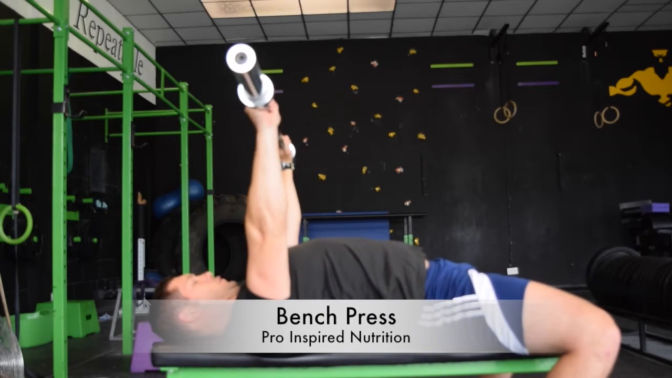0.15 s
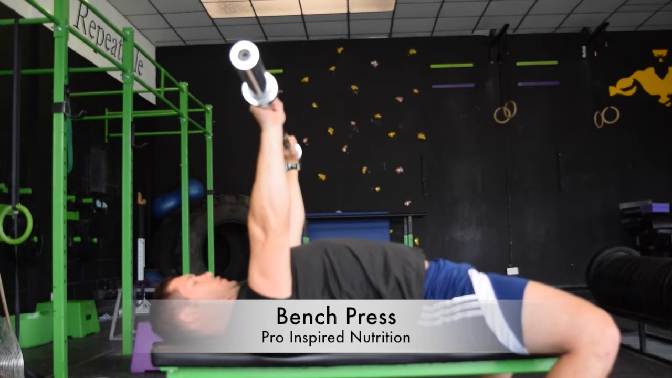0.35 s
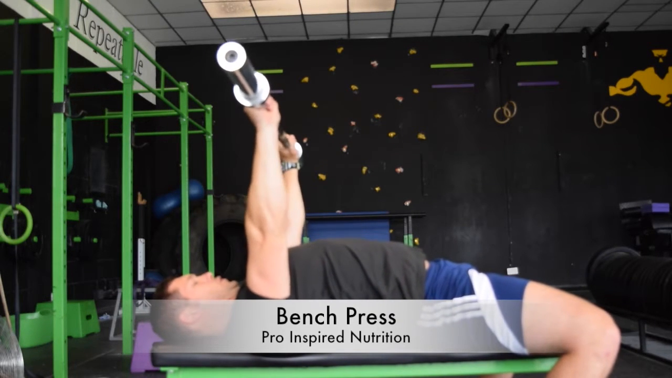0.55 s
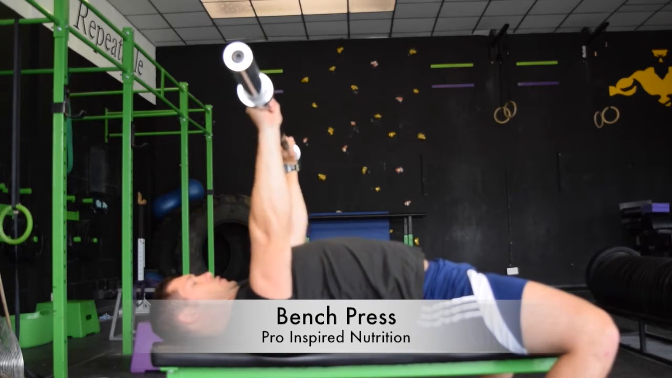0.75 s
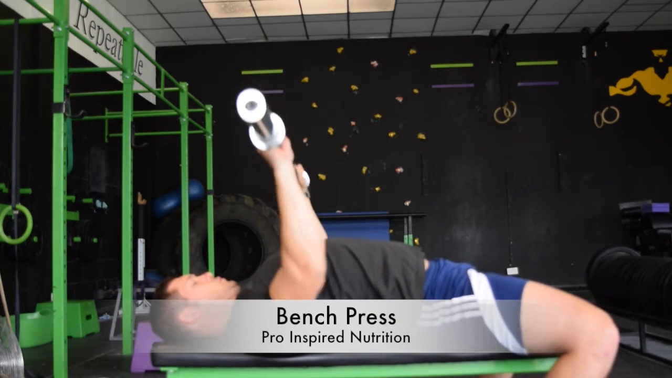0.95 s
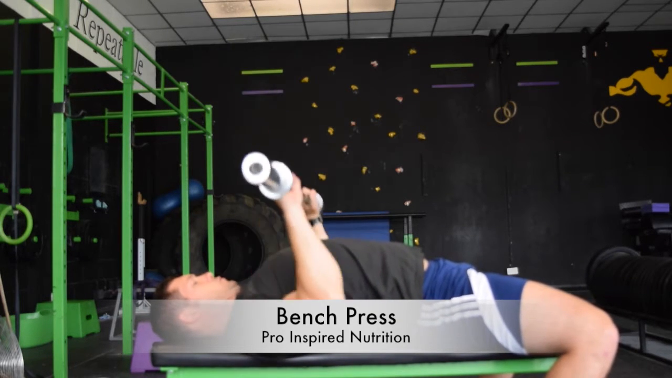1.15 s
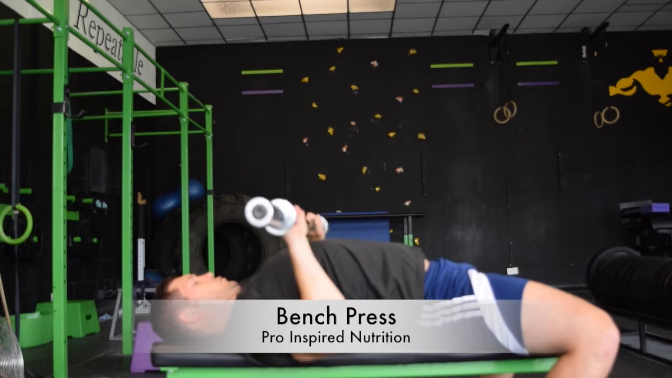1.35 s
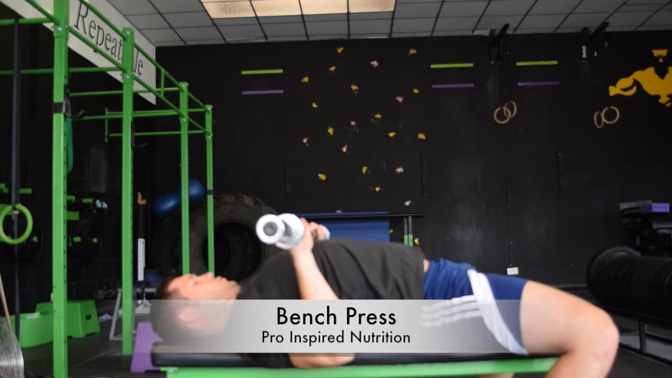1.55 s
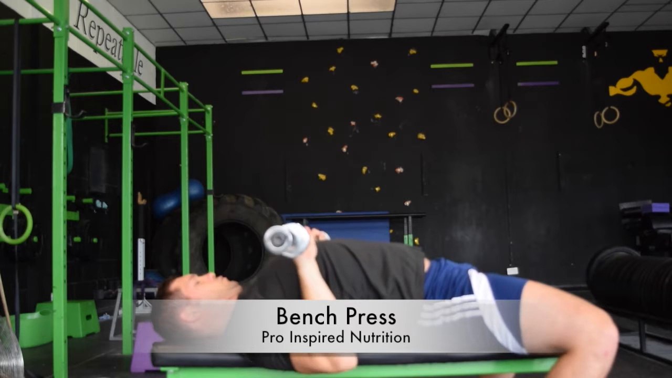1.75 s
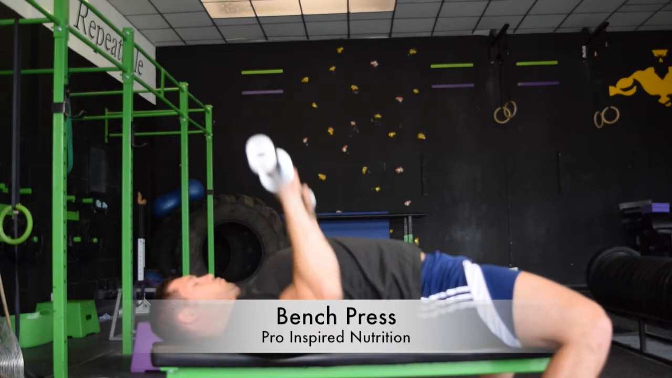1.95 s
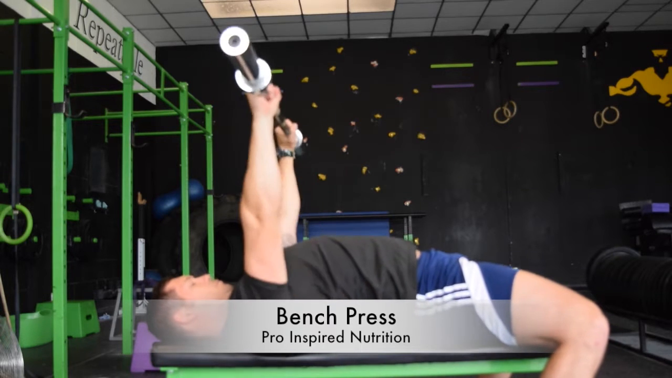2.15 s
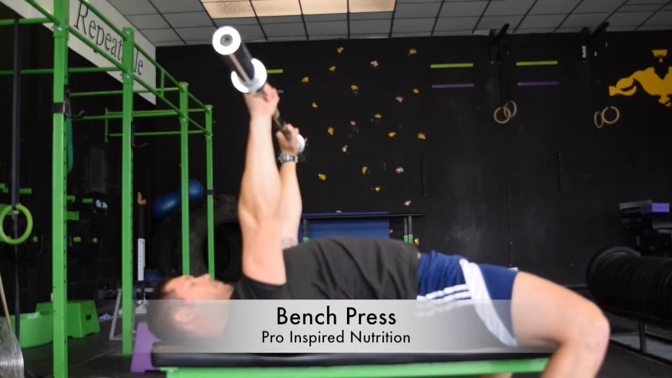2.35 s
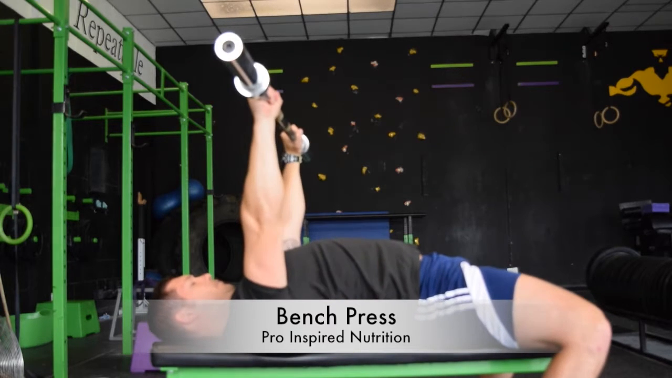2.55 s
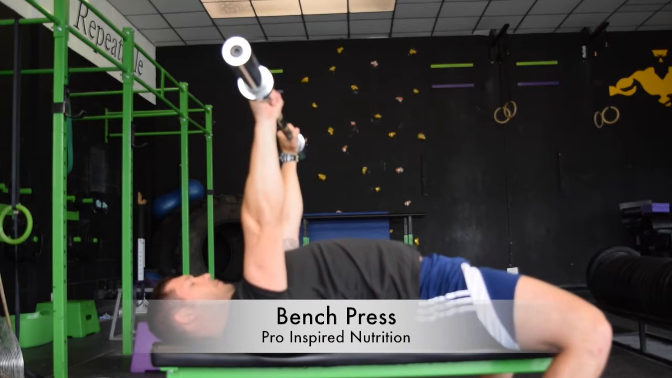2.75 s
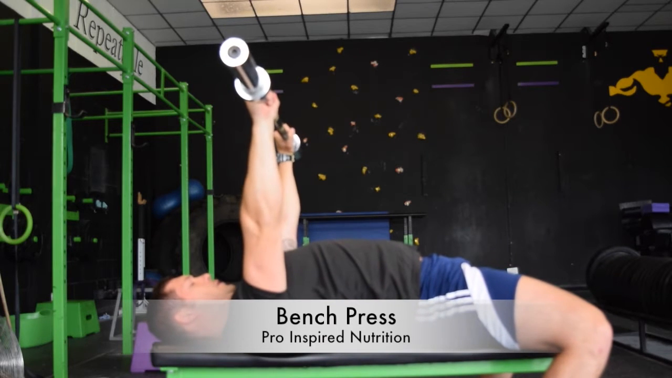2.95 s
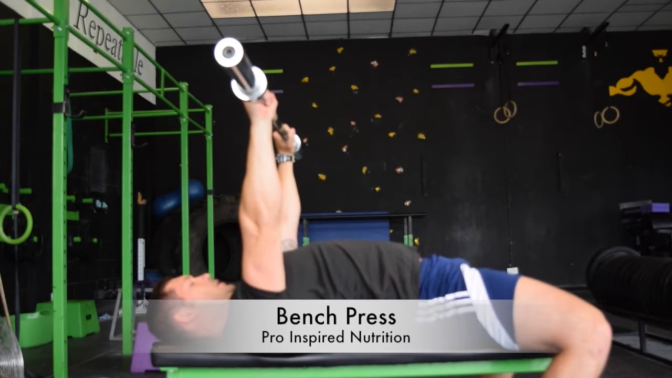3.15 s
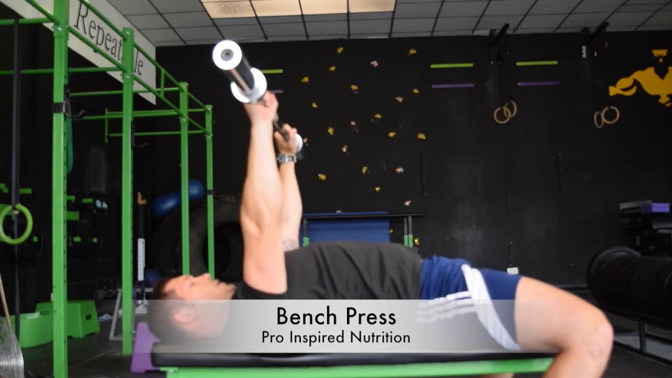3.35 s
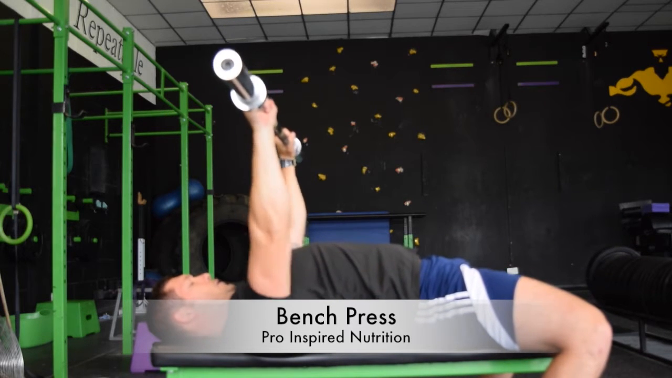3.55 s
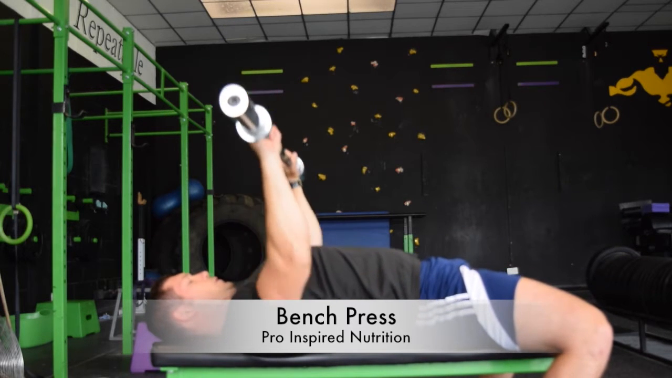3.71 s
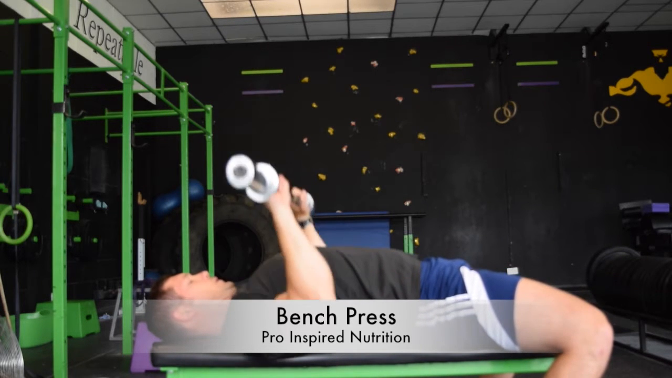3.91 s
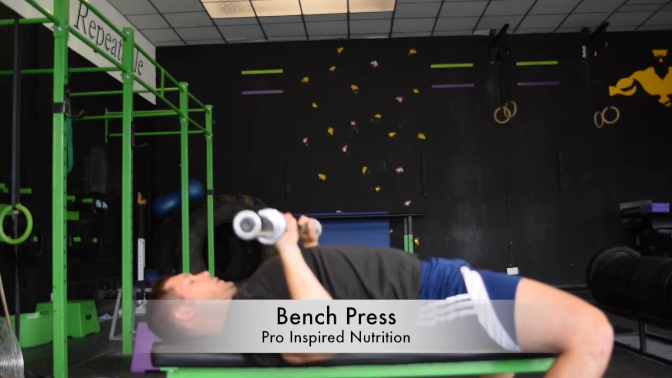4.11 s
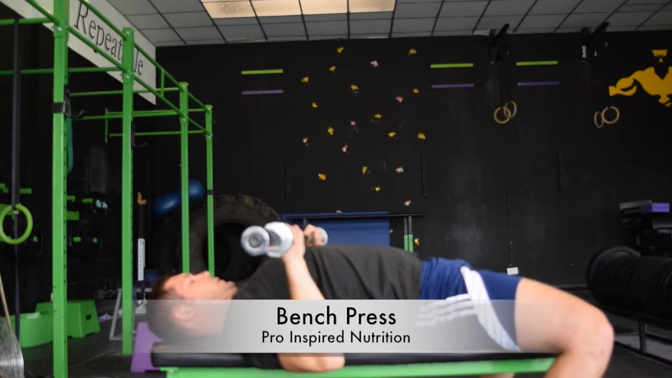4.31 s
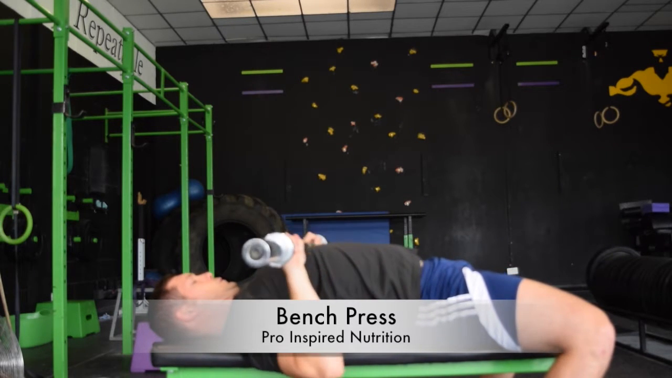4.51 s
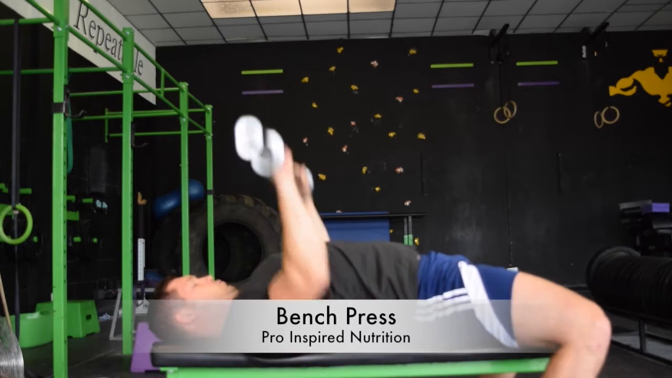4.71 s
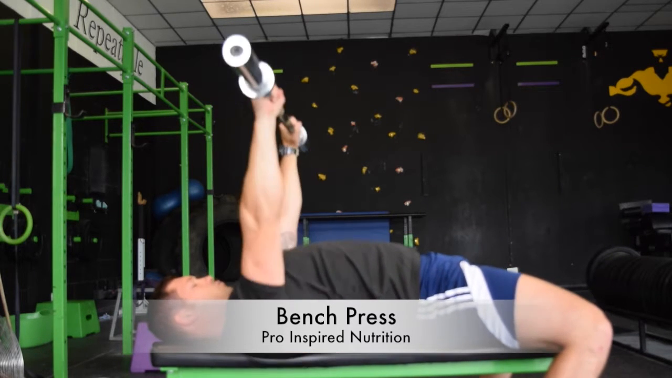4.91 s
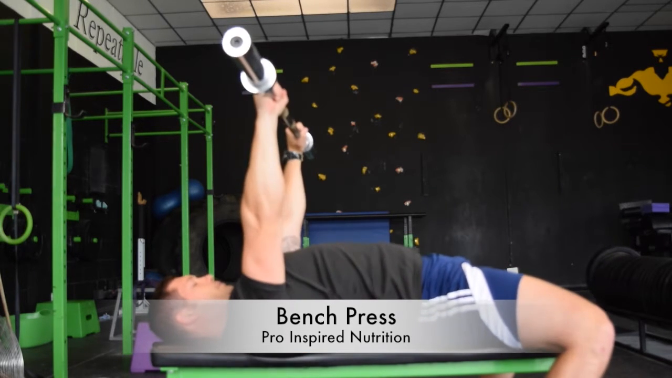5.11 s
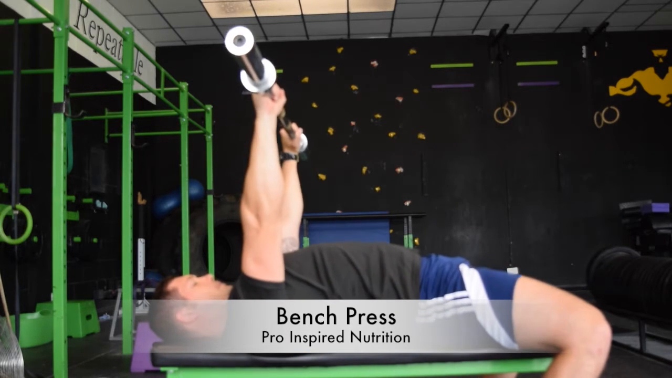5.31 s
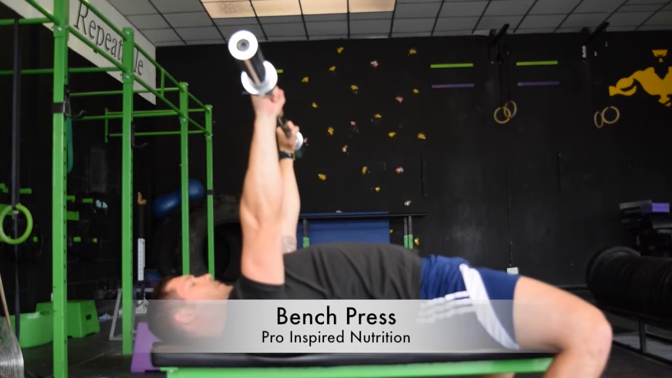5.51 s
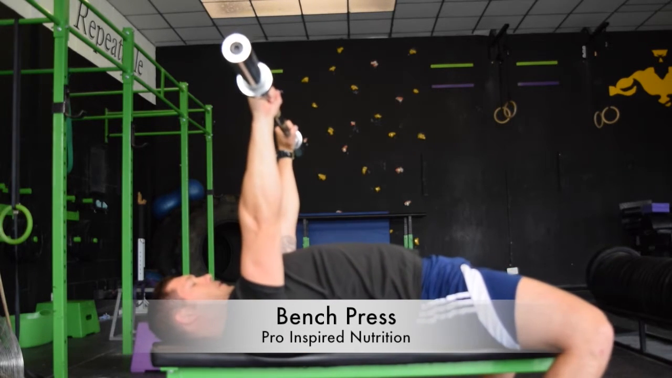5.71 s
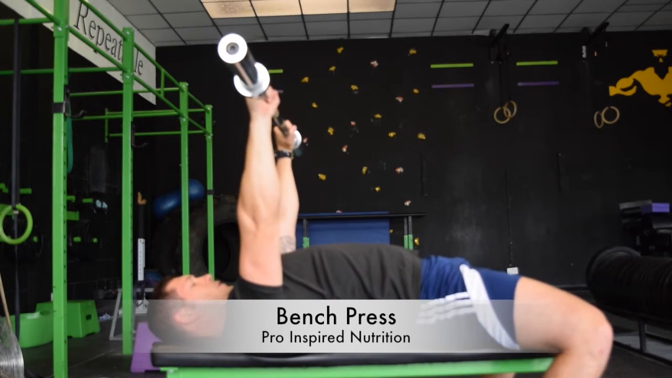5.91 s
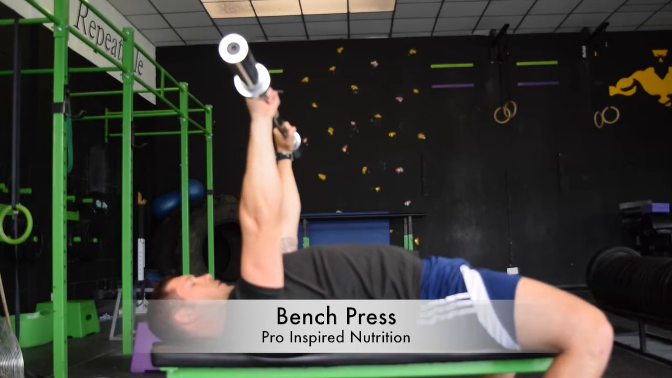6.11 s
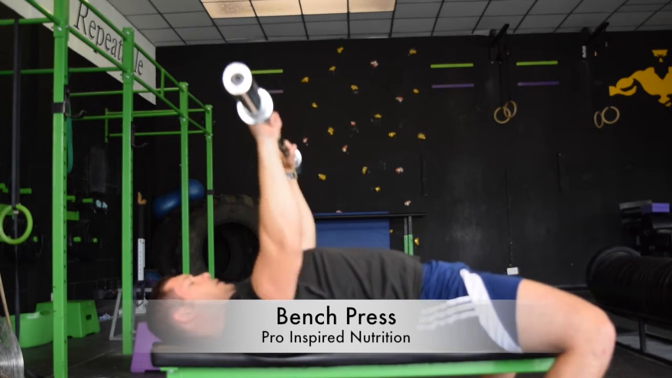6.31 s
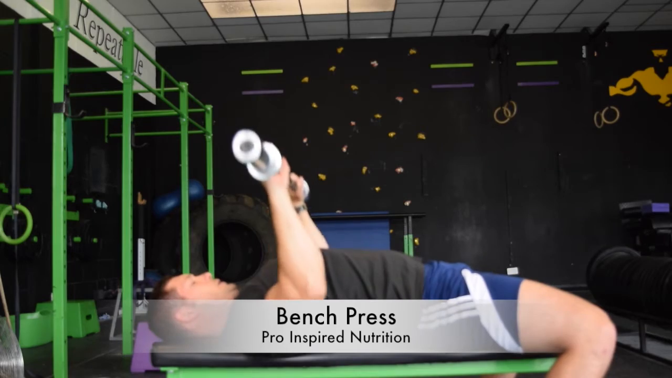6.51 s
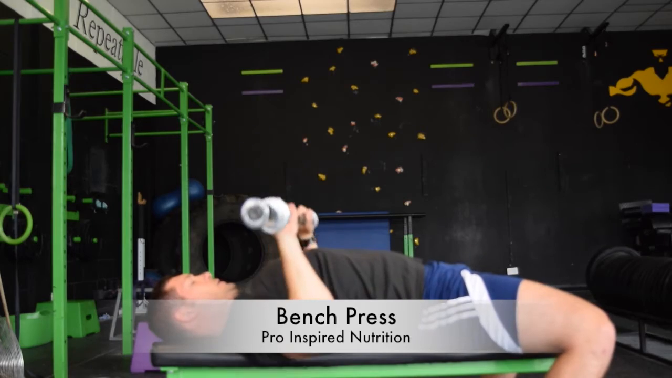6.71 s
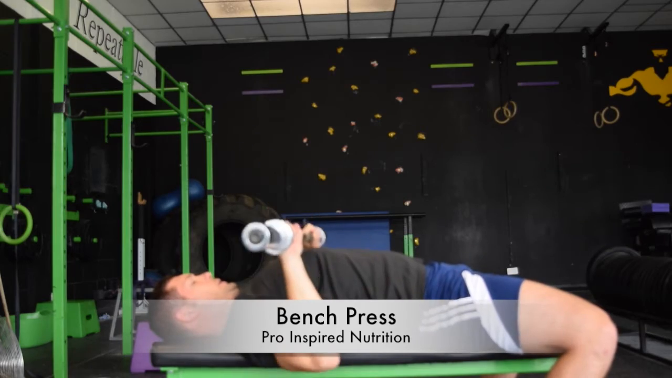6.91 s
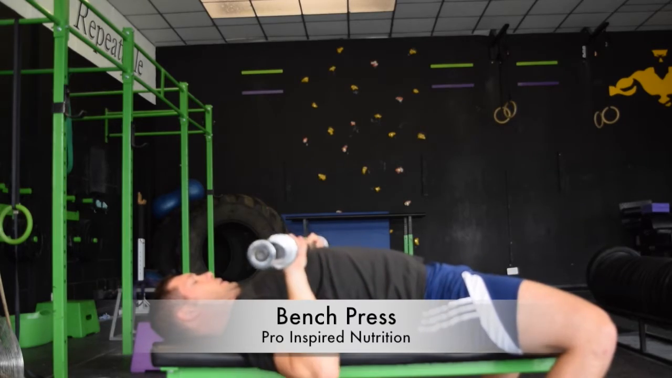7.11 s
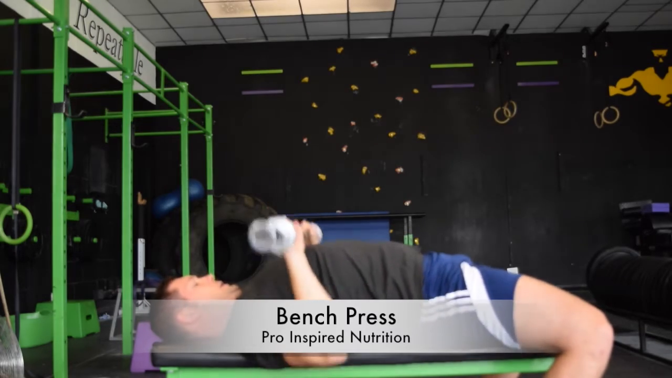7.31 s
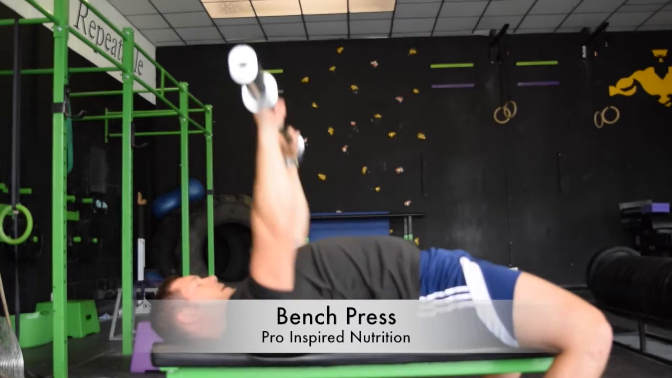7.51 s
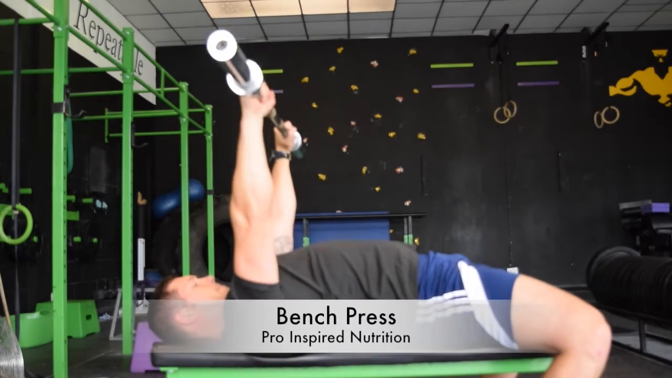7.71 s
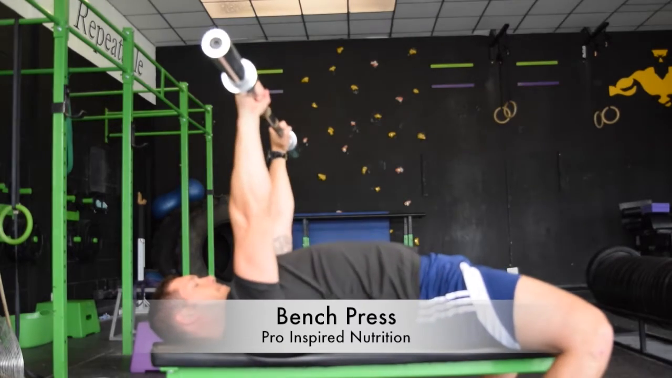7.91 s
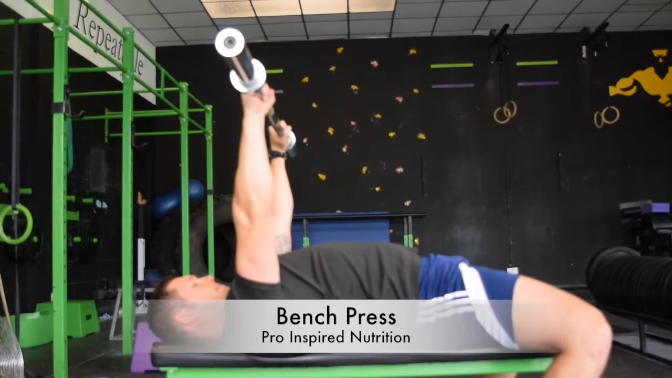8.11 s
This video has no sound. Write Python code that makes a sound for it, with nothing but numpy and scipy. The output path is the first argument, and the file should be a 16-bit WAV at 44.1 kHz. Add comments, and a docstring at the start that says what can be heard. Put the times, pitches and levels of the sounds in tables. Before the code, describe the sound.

Three presses of a steel bar, each with a quick bright rattling clank, in a large bare hall with low hum and an engine drone outside.

```python
"""Barbell presses in a bare gym

A steel barbell is pressed up three times in a large bare gym. Loose sleeves knock against the bar: a short
pulse with crack and rattle, a ring of decaying steel modes, and a filtered click that clanks in the hall.
Behind it are shaped noise for ventilation, traffic and a faint whistle, an engine drone that slows, swells
and fades, and steady mains tones. One microphone hears it all and adds hiss."""
import sys
import numpy as np
from scipy import signal
from scipy.fft import rfft, irfft
from scipy.io import wavfile

SR = 44100
rng = np.random.default_rng(int(sys.argv[2]) if len(sys.argv) > 2 else 0)


def to_wav(s):
    """Save 16-bit WAV."""
    ch = np.atleast_2d(s).T  # columns
    pcm = np.round(np.clip(ch, -1, 1) * 32767)  # PCM
    wavfile.write(sys.argv[1], SR, pcm.astype(np.int16))


N = 364266
TIME = np.arange(N) / SR

# Sleeve knocks. Each row: start in seconds, pulse peak in dB, pulse colour in Hz, then weights in dB relative
# to the pulse for crack, clank, bar ring, low sleeve ring and high sleeve ring, last near sleeve's tilt in dB
# (added to the near sleeve's own modes, taken from the far sleeve's).
KNOCKS = [(0.1772, -51.5, 9000, -10, -14, -28, -29, -29, 0),
          (2.0354, -39.5, 4700, -16, 14.5, -6.5, -22, -23, -2),
          (2.1417, -32, 4360, -22, 9.5, -11, -23, -26, -3), (2.1588, -40, 5500, -12, 16, -22, -16, -17, 8),
          (2.1642, -26, 5510, -4, -17, -16, -12, -12, 6), (2.241, -25, 2400, -27, -11, -5, -28, -30, 0),
          (2.247, -11, 4560, 0.5, 0, -10, -36, -14.5, -8.5),
          (2.2581, -11.5, 3915, -12, -21, -8.5, -33, -15, -3), (2.412, -34, 3950, -20, -7, -1, -30, -30, 0),
          (4.6980, -37, 1600, 2.5, -2, -28, -36, -36, 0), (4.6996, -35, 6370, -3, -9, -30, -43, -36, 0),
          (4.714, -42, 3000, -20, -12, -32, -25, -27, 0), (4.7767, -37.5, 5580, -10, 15, 0, -12, -29, 1),
          (4.790, -29.5, 2420, -20, 1.5, -11, -18, -27, -9),
          (4.838, -30.5, 3620, -12, 6.5, -9, -19, -21, -6),
          (4.8487, -19, 6340, -12, 3, -9, -13.5, -12.5, -2.5),
          (4.9410, -12.5, 4750, 5, 2, -19, -31, -20, 0), (4.9544, -22, 5230, -15, -3, -7, -18, -14, 0),
          (5.1100, -34.5, 5400, -17, -16, -16, -19, -20, 3),
          (7.3180, -49.5, 3400, -1, -5, -6, -23, -16, -2), (7.504, -41, 5000, -16, 10, -20, -26, -28, 0),
          (7.5172, -30, 2500, -22, 3, -13, -12, -19, 0), (7.571, -16, 4860, -26, -16, -26, -35, -37, 0),
          (7.5755, -8.5, 5060, -2.5, -7, -23, -28, -34, 6), (7.587, -36, 10650, -20, -10, -22, -14, -11, 1),
          (7.5963, -22.5, 5520, -20, -8, -2, -18, -7.5, 9),
          (7.6762, -9.5, 5470, -20, -9.5, -21, -42, -12.5, 2),
          (7.6901, -14, 5240, -22, 1, -11, -30, -17, 4)]
# Noise outside and in the ducts. Each row: time in seconds, then ventilation rumble, traffic roar and
# passing tyre hiss, each in dB rms before its slow drift.
BACKGROUND = [(0, -41, -51.5, -56), (1.2, -44, -51, -57.5), (2.2, -45.5, -53, -60), (4, -46.5, -53.5, -64),
              (5.6, -47, -49.5, -64.5), (6.6, -46, -50, -64), (8.26, -46.5, -49.5, -60.5)]


def from_db(db):
    """Turn decibels into an amplitude gain."""
    return 10 ** (np.asarray(db) / 20)


def rms_one(x):
    """Scale a signal to rms 1."""
    return x / np.sqrt(np.mean(x ** 2) + 1e-20)


def in_time(rows):
    """Interpolate each column of a timed table, sample by sample."""
    seconds, *columns = np.transpose(rows)
    return [np.interp(TIME, seconds, column) for column in columns]


def at_hz(points, hz):
    """Read a table of (Hz, value) on a log-frequency axis."""
    table_hz, values = np.array(points).T
    return np.interp(np.log(hz), np.log(table_hz), values)


def drift(rate_hz):
    """Slow random motion of rms 1: white noise through two equal low-pass poles at rate_hz."""
    step = 40   # computed on every 40th sample
    pole = np.exp(-2 * np.pi * rate_hz * step / SR)
    white = rng.standard_normal(N // step + 2002)
    slow = signal.lfilter([1], [1, -2 * pole, pole * pole], white)[2000:]   # skip the filter's start
    return np.interp(np.arange(N) / step, np.arange(len(slow)), rms_one(slow))


def coloured(x, spectrum):
    """Shape a signal by a gain curve of (Hz, dB)."""
    hz = np.maximum(np.arange(len(x) // 2 + 1) * SR / len(x), 1)
    return irfft(rfft(x) * from_db(at_hz(spectrum, hz)), len(x))


def noise(spectrum, level_db):
    """White noise shaped by a spectrum, scaled to rms 1, then given a fixed or moving level."""
    return rms_one(coloured(rng.standard_normal(N), spectrum)) * from_db(level_db)


def ventilation():
    """Low rumble of moving air: shaped noise with a slight slow drift in level."""
    # Each row: frequency in Hz, relative density in dB per Hz.
    rumble = [(15, -40), (25, -38), (43, -6.5), (97, -0.5), (172, -2.5), (204, -4), (305, -12.5),
              (600, -21.5), (780, -28), (1320, -120)]
    return noise(rumble, in_time(BACKGROUND)[0] + 0.21 * drift(1.0))


def traffic():
    """Road noise outside: roar, passing tyre hiss and heavy traffic through the walls, each drifting noise."""
    # Roar, tyre hiss and deep spectra. Each row: frequency in Hz, relative density in dB per Hz.
    roar, tyres, deep = [(250, -4), (550, -3.5), (900, 3), (1300, -0.5), (2000, -13), (3500, -38),
                         (6000, -47), (16000, -81.5)], [(600, -5.5), (1500, 10.5), (3300, 4), (4200, -2.5), (8000, -20),
                                       (16000, -39)], [(25, -54), (50, -3), (85, -5), (125, 6.5), (200, -29),
                                                      (500, -93.5)]
    # Heavy traffic. Each row: time in seconds, level in dB rms before its drift.
    deep_level = [(0, -73), (3.5, -64), (4.8, -50.5), (6.3, -68), (7.05, -47.5), (8.26, -57.5)]
    _, roar_db, tyre_db = in_time(BACKGROUND)
    road = noise(roar, roar_db + 0.7 * drift(6.1))
    road = road + noise(tyres, tyre_db + 0.5 * drift(1.6))
    return road + noise(deep, in_time(deep_level)[0] + 3.5 * drift(3.2))


def whistle(hz, half_width_hz):
    """Faint thin whistle: noise in a narrow band around hz, with a moving level."""
    # Each row: time in seconds, level in dB.
    squeal = [(7.1, -80), (7.38, -71), (7.44, -64), (7.56, -72)]
    edges = [hz - half_width_hz, hz + half_width_hz]
    band = signal.butter(2, edges, "band", fs=SR, output="sos")
    return rms_one(signal.sosfilt(band, rng.standard_normal(N))) * from_db(in_time(squeal)[0])


def engine_drone():
    """Engine outside: one sine that holds its pitch, then slows towards idle, wavering in pitch and level."""
    engine_hz, idle_hz = 71, 57.5
    slows_at_s, slowing_s = 3.2, 0.758   # start and time constant of the slowing
    # Each row: time in seconds, level in dB rms before its drift.
    drone_level = [(0, -41), (1.33, -40.5), (1.6, -60), (2.1, -50), (2.33, -45), (3.1, -50.5), (3.35, -59),
                   (4.47, -49), (5.05, -45.5), (6.4, -81)]
    since_slowing = np.maximum(TIME - slows_at_s, 0)
    hz = idle_hz + (engine_hz - idle_hz) * np.exp(-since_slowing / slowing_s)
    level_db = in_time(drone_level)[0] + 1.04 * drift(5.5)
    phase = 2 * np.pi * np.cumsum(hz + 0.5 * drift(3.9)) / SR
    return np.sqrt(2) * from_db(level_db) * np.sin(phase)


def mains_hum():
    """Mains hum: steady sines from random phases, their levels drifting slightly."""
    # Each row: frequency in Hz, level in dB rms before its drift.
    mains = [(200, -52.5), (300, -61.5)]
    hum = 0
    for hz, db in mains:
        level = np.sqrt(2) * from_db(db + 0.47 * drift(1.15))
        hum = hum + level * np.sin(2 * np.pi * hz * TIME + rng.uniform(0, 2 * np.pi))
    return hum


def background():
    """Sum everything behind the barbell."""
    return ventilation() + traffic() + engine_drone() + mains_hum() + whistle(hz=3400, half_width_hz=110)


def hall(x):
    """Gym echo: dense noise that swells in, is strong at first, then dies band by band; echo energy 1."""
    # Each row: frequency in Hz, time in seconds to fall 60 dB.
    hall_t60 = [(300, 0.53), (790, 0.77), (2090, 1), (5510, 0.74), (14600, 0.2)]
    swell_s, early_db, early_t60_s = 0.007, 8.5, 0.064   # early part: extra gain, multiplying the tail
    t = TIME[:round(1.5 * SR)]
    edges, tail = np.geomspace(200, 18000, 14), 0
    for low, high in zip(edges, edges[1:]):
        band_filter = signal.butter(2, [low, high], "band", fs=SR, output="sos")
        band = signal.sosfilt(band_filter, rng.standard_normal(len(t)))
        tail = tail + band * from_db(-60 * t / at_hz(hall_t60, np.sqrt(low * high)))
    swell = 1 - np.exp(-(t / swell_s) ** 2)
    tail = tail * swell * (1 + from_db(early_db - 60 * t / early_t60_s))
    return signal.fftconvolve(x, tail / np.sqrt(np.sum(tail ** 2)))[:N]


def clicks_at(level_db):
    """One single-sample click for each knock."""
    out = np.zeros(N)
    out[(np.array(KNOCKS)[:, 0] * SR).astype(int)] = from_db(level_db)
    return out


def clank():
    """Broad clank sent to the hall: shaped clicks, with a bright part that grows faster with the blow."""
    # Body and bright part. Each row: frequency in Hz, relative gain in dB.
    body, crash = [(180, -13), (350, -15), (800, -3), (1500, -6.5), (2450, -2), (3100, -9.5), (4500, -18),
                   (7000, -16.5), (10000, -52)], [(2000, -42), (3500, -37), (5300, -11), (7500, -9), (9000, -8),
                                  (11000, -9), (16000, -31)]
    tick_db, clank_db = np.array(KNOCKS)[:, [1, 4]].T
    dull = coloured(clicks_at(tick_db + clank_db + 23.0), body)
    # harder blows are shorter, so brighter
    bright = coloured(clicks_at(1.6 * tick_db + clank_db + 26), crash)
    return dull + bright


def ticks(cycles, rattle_t60, rattle_width):
    """Contact: a few cycles at the knock's colour, a broad crack, then a rattle of micro-bounces as noise."""
    rattle_gain_db, rattle_follows = -4, 0.65   # gain at a -25 dB tick; growth in dB per dB of tick
    crack_t60_s, crack_from_hz, crack_to_hz = 0.0021, 570, 15000
    out, t = np.zeros(N), np.arange(1024) / SR
    grit = rng.standard_normal((len(KNOCKS), 1024))
    crack_filter = signal.butter(1, [crack_from_hz, crack_to_hz], "band", fs=SR)
    for (s, db, hz, crack_db, *_), grains in zip(KNOCKS, grit):
        # pulse: ramps up, then falls 60 dB within the given number of cycles
        pulse = np.sin(2 * np.pi * hz * t) * t * hz * from_db(-60 * t * hz / cycles)
        pulse = pulse / np.abs(pulse).max()

        crack = signal.lfilter(*crack_filter, grains[::-1])
        crack = crack * from_db(crack_db - 60 * t / crack_t60_s)

        edges = [hz / rattle_width, min(hz * rattle_width, 0.45 * SR)]
        rattle = rms_one(signal.lfilter(*signal.butter(2, edges, "band", fs=SR), grains)) / 2
        rattle_db = rattle_gain_db + (rattle_follows - 1) * (db + 25.0)   # relative to the pulse
        rattle = rattle * from_db(rattle_db - 60 * t / rattle_t60)

        i = int(s * SR)
        out[i:i + 1024] += from_db(db) * (pulse + crack + rattle)
    return out


def steel(ring_db, spread_db, favour_db, jolt_db, jolt_t60, wobble_db, wobble_rate,
          bar_wander_rad, sleeve_wander_rad):
    """Knocks excite decaying modes of bar and sleeves, favouring modes near their colour; grip shortens them."""
    # Mode frequencies in Hz. Rows: the bar, the sleeves' low modes, the sleeves' high modes; close pairs beat.
    modes_hz = [
        [1475, 1884, 2347, 2385, 2525, 2826, 3915, 4560, 5227, 5885, 6627, 7381],
        [2449, 2490, 5516, 5575],
        [8610, 9054, 9503, 9525, 9590, 10632, 10681, 12080, 12170, 13065, 13560, 14227, 15360],
    ]
    # Same layout, each mode: relative strength in dB, full time in seconds to fall 60 dB.
    mode_rings = [
        [(-8, 0.15), (-10, 0.41), (-6, 0.6), (-1.5, 1.05), (-6, 0.7), (-10, 0.3), (-17, 0.8), (-12, 0.6),
         (-16, 0.9), (-14, 0.47), (-13, 0.5), (-14, 0.4)],
        [(-8, 0.2), (-7, 0.2), (-2.5, 0.45), (-3, 0.25)],
        [(-12, 0.35), (-1.5, 0.62), (-1.5, 1.0), (-1.5, 0.6), (-8, .4), (-3, 0.45), (-4, 0.55), (-10, 0.22),
         (-9, .4), (-8, 0.1), (-15, 0.25), (-12, 0.24), (-15, 0.12)],
    ]
    # Each row: lift start in seconds, share of the full ring time for the bar, share for the sleeves.
    lift_rows = [(1.8, 0.96, 1), (4.5, 0.55, 0.77), (7.25, 0.57, 0.56)]
    # The two sleeves differ a little: modes in Hz that belong to one sleeve alone.
    near_hz, far_hz = [2490, 5516, 9525, 10632], [2449, 5575, 9054, 9503, 10681]
    hard_db, regrip_db = -17, -16   # a harder knock reseats the sleeves and damps what was ringing
    soft_shortens = 0.1   # dB of ring time lost per dB below a hard knock

    t = TIME[:SR * 3 // 4]
    luck = rng.standard_normal((len(KNOCKS), 40))
    family = np.repeat(np.arange(len(modes_hz)), [len(f) for f in modes_hz])
    part = np.minimum(family, 1)   # 0 is the bar, 1 the sleeves
    hz, (mode_db, t60) = np.concatenate(modes_hz), np.concatenate(mode_rings).T
    lifts = np.array(lift_rows)
    side = 1. * np.isin(hz, near_hz) - np.isin(hz, far_hz)
    sway = [drift(wobble_rate) for _ in hz]
    # loose parts keep touching, which blurs each pitch
    wander_rad = np.where(part, sleeve_wander_rad, bar_wander_rad)
    wander = wander_rad[:, None] * np.roll(sway, 1, axis=0)
    modes = np.zeros((len(hz), N + SR))
    jolt = from_db(jolt_db - 60 * t / jolt_t60)   # loud and quickly damped while the parts still touch
    rise = 1 - np.exp(-t / .0012)   # the blow takes a moment to spread through the steel

    for (s, tick_db, tick_hz, _, _, *part_db, side_db), draw in zip(KNOCKS, luck):
        near_colour = np.exp(-(np.log(hz / tick_hz) / .02) ** 2)
        lift = lifts[max(np.searchsorted(lifts[:, 0], s) - 1, 0)]
        share = lift[1:][part] * from_db(soft_shortens * min(tick_db - hard_db, 0))
        level_db = tick_db + ring_db + np.array(part_db)[family] + mode_db
        level_db = level_db + favour_db * near_colour + side * side_db
        strengths = from_db(level_db + spread_db * draw[:len(hz)])
        i = int(s * SR)
        if tick_db > hard_db:
            modes[:, i:i + len(t)] *= from_db(regrip_db)
        for k, (strength, ring_s) in enumerate(zip(strengths, t60 * share)):
            length = min(int(np.clip(ring_s, .12, .6) * SR), N - i)
            u = t[:length]
            envelope = (np.exp(-np.log(1000) * u / ring_s) + jolt[:length]) * rise[:length]
            phase = 2 * np.pi * hz[k] * u + wander[k][i:i + length]
            modes[k, i:i + length] += strength * envelope * np.sin(phase)
    # the loose sleeves rock and turn, so each mode swings towards and away from the listener
    return sum(mode[:N] * from_db(wobble_db * swing) for mode, swing in zip(modes, sway))


def barbell():
    """Ticks and rings come direct and from the hall; the broad clank is heard through the hall only."""
    rings = steel(ring_db=-14.5, spread_db=2, favour_db=6.5, jolt_db=8.0, jolt_t60=0.044,
                  wobble_db=3, wobble_rate=23.5, bar_wander_rad=1.7, sleeve_wander_rad=1.0)
    contact = ticks(cycles=3.0, rattle_t60=0.026, rattle_width=1.19)
    to_hall = clank() + from_db(-3.0) * rings + from_db(-9.0) * contact
    return rings + contact + hall(to_hall)


def scene():
    """Barbell over the background, one channel."""
    return (barbell() + background())[None]


def record(dry):
    """The microphone adds its own steady hiss, then a steep low-pass cuts the top."""
    # Microphone hiss. Each row: frequency in Hz, relative density in dB per Hz.
    hiss = [(2500, -1.5), (5000, 3), (9000, -2), (16000, -12.5)]
    hiss_db, cutoff_hz = -68.5, 16250   # rms before the cut; 60 dB down from here up
    top_cut = signal.cheby2(16, 60, cutoff_hz, fs=SR, output="sos")
    return signal.sosfilt(top_cut, dry + noise(hiss, hiss_db))


dry = scene()
out = record(dry)
to_wav(out)
```